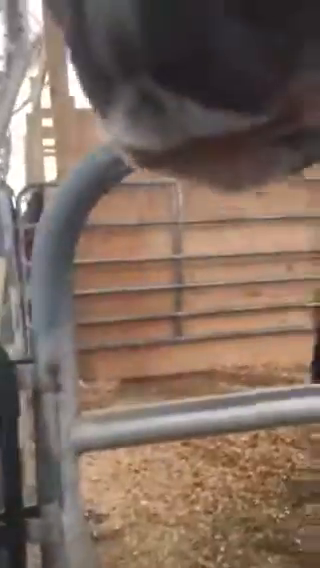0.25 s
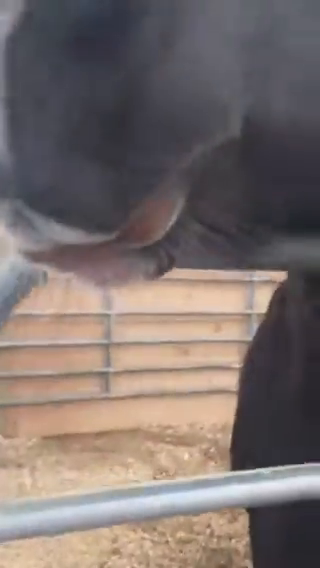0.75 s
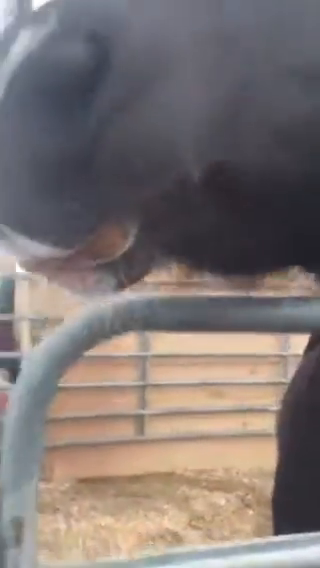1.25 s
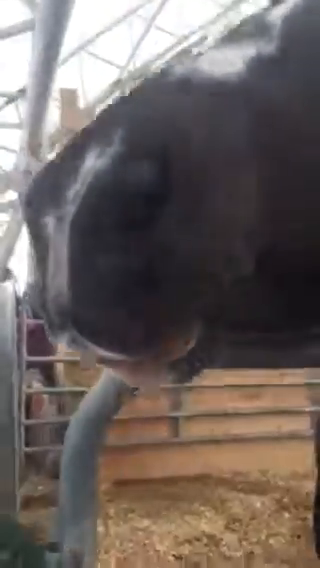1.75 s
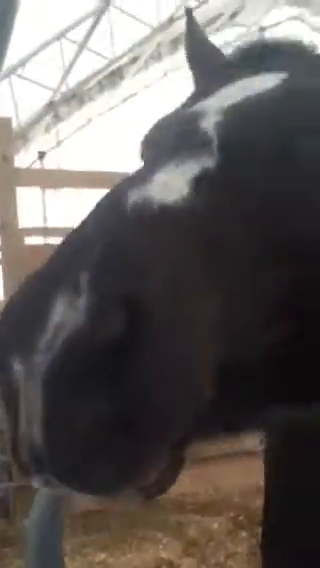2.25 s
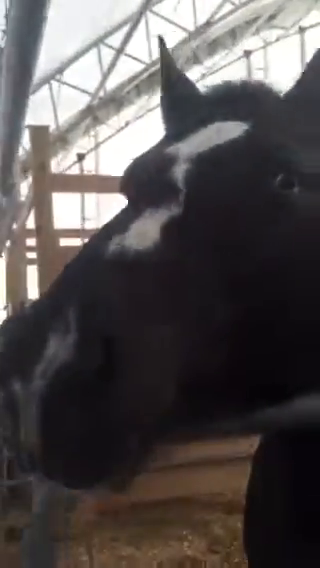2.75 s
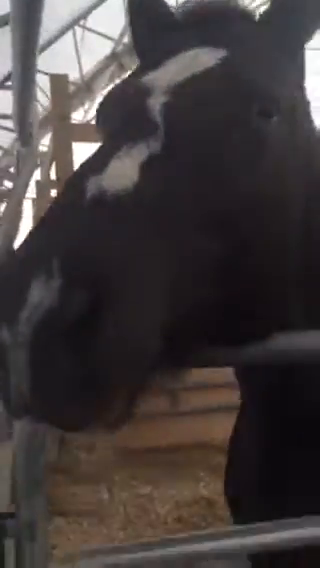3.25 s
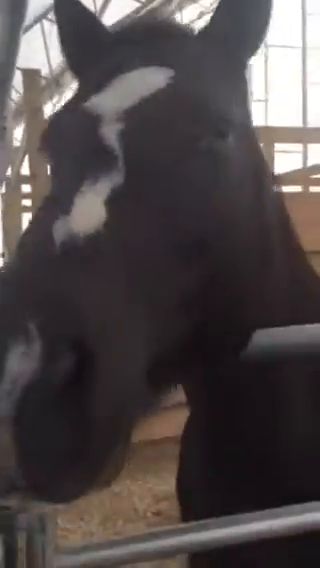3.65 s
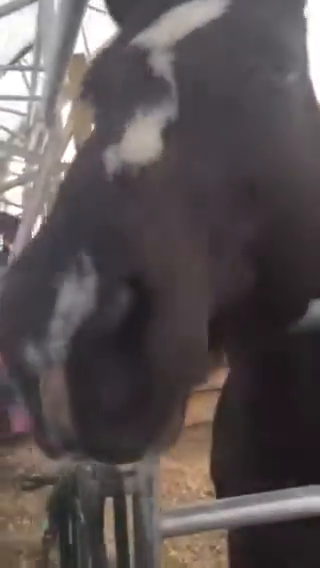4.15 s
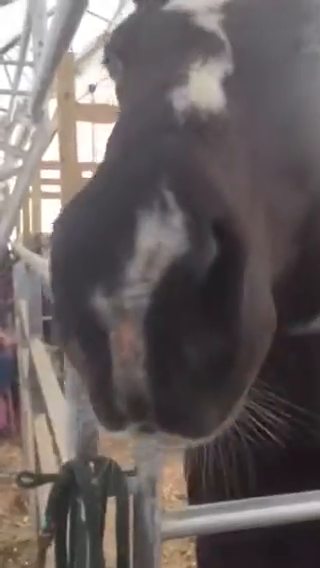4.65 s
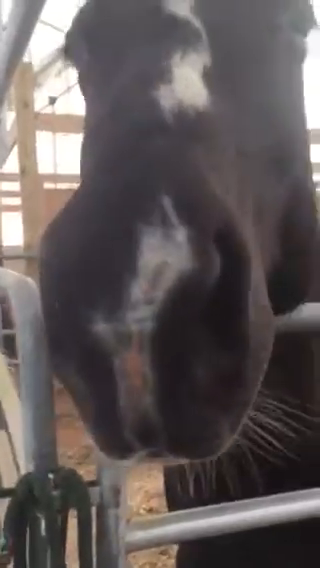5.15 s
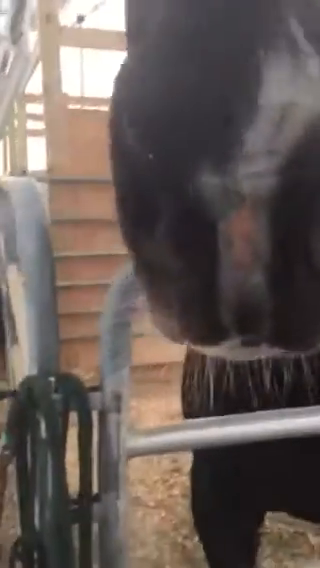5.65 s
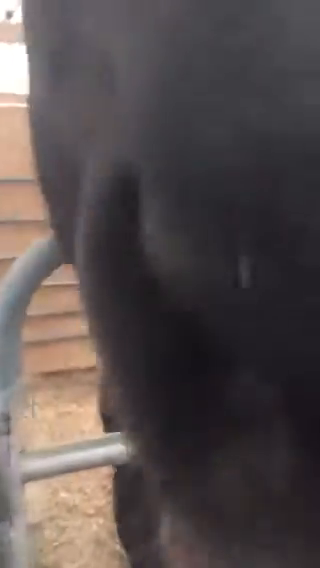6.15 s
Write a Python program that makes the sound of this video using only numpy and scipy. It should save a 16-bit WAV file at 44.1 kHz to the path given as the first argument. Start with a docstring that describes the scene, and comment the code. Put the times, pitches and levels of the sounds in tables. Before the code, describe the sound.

Close, crisp, bony crunching from a horse's mouth, sparse in the middle and thickest near the end, finishing with small wet lip smacks.

```python
"""An open barn: a horse grinds hard candy between its molars, its muzzle close to a small microphone.
Each crack is a ragged noise burst that rings the skull and mouth and knocks the jaw. Between the cracks,
trains of tiny fractures make the crumbs and fizz over a low noise drone of bone. Falling sines thud in
the jaw, low noise puffs on the microphone, and at the end noise bursts ring short hollow modes as the
lips smack. Soft barn air and steady microphone hiss lie underneath."""
import sys
import numpy as np
from scipy import signal
from scipy.io import wavfile
from scipy.ndimage import uniform_filter1d

SR = 44100
rng = np.random.default_rng(int(sys.argv[2]) if len(sys.argv) > 2 else 0)


def waveform_to_disk(signal):
    """Save audio, clipped to [-1, 1], as 16-bit WAV at the path in sys.argv[1]."""
    frames = np.transpose(np.atleast_2d(signal))
    scaled = np.clip(frames, -1, 1) * 32767
    samples = np.round(scaled).astype(np.int16)
    wavfile.write(sys.argv[1], SR, samples)


N = 281799  # samples

# colour of the head for sound made between the teeth: pitch_hz, relative level_db
HEAD_COLOUR = [(500, -44), (800, -31), (1050, -7.5), (1300, -11.5), (1750, -5), (2300, -21), (2700, -2),
               (3200, 7), (3900, -4.5), (4400, -18), (4850, -33.5), (5400, -28.5), (7800, -37.5),
               (10300, -53.5), (13000, -50.5), (16000, -54.5)]
GLINT_HZ = 9100  # the top zone starts here
# zones of the head (snap, mouth ring, splinter, top): from_hz, to_hz, burst_ms (time to its peak)
HEAD_ZONES = [(2110, 4740, 0.6), (690, 2378, 0.9), (4570, GLINT_HZ, 0.64), (GLINT_HZ, SR, 0.4)]
# fractures of the candy: start_s, snap_peak_db, mouth_ring_peak_db, splinter_treble_peak_db
CRACKS = [(0.0795, -27.5, -40, -36), (0.143, -30, -36, -39.5), (0.1688, -22.5, -38, -40),
          (0.2393, -25, -40, -36), (0.2966, -43, -32, -48.5), (0.3062, -31.5, -27, -42.5),
          (0.7004, -19.5, -23, -33.5), (1.084, -22.5, -25, -31.5), (1.108, -24.5, -50, -31),
          (1.1121, -27.5, -28, -33), (1.1455, -25, -41, -62), (1.173, -27, -56, -34.5),
          (1.197, -26, -29.5, -66), (1.222, -15, -25.5, -34), (1.381, -47, -55, -45.5),
          (1.3386, -30, -27.5, -49), (1.3992, -29, -43, -40), (1.424, -29, -37, -43),
          (1.4607, -30.5, -29, -38.5), (1.537, -27, -29, -58), (1.5908, -35, -52, -39.5),
          (1.8154, -25, -34.5, -37), (1.9635, -28, -40, -60), (1.9922, -17.5, -33, -48),
          (2.0255, -14.5, -24.5, -35.5), (2.039, -30, -22, -47), (2.06, -51.5, -60, -43),
          (2.06, -21.5, -19, -36.5), (2.3587, -30.5, -41, -50), (2.4027, -29, -43, -61),
          (2.858, -19.5, -30, -30.5), (3.2032, -26, -28, -46.5), (3.5703, -43, -39.5, -48),
          (3.898, -37, -46, -50), (4.0014, -37, -55, -61), (4.056, -45, -37.5, -59), (4.106, -32, -53, -67),
          (4.118, -41, -60, -69), (4.1603, -20, -30, -31.5), (4.163, -59, -63, -49.5),
          (4.194, -42, -43, -47), (4.4935, -21.5, -24.5, -36.5), (4.5067, -42, -36.5, -62),
          (4.605, -25.5, -57, -47), (4.625, -21, -58, -41), (4.636, -34, -60, -47.5),
          (4.672, -33.5, -46, -55), (4.691, -8, -24, -29), (4.7113, -13.5, -32, -34),
          (4.739, -26, -33.5, -48), (4.748, -20.5, -44, -37), (4.7545, -20, -45, -48),
          (4.826, -34.5, -53, -52), (4.848, -36.5, -48, -53), (4.9265, -28, -28.5, -38.5),
          (4.937, -22.5, -46, -33), (5.051, -41, -36, -50), (5.1047, -47, -27.5, -54),
          (5.153, -41, -42, -53), (5.19, -29.5, -34.5, -42), (5.2235, -27.5, -25, -38.5),
          (5.231, -30, -40, -44), (5.246, -36, -27, -48), (5.259, -21.5, -28.5, -32),
          (5.272, -32, -35, -39), (5.2825, -18, -24, -30), (5.301, -25, -57, -37), (5.3126, -31, -37, -44),
          (5.336, -20, -36, -38), (5.341, -30, -26, -34), (5.346, -18.5, -34, -33.5),
          (5.351, -31, -25, -31), (5.357, -20.5, -28, -42), (5.3621, -19, -22.5, -30),
          (5.371, -34, -29, -36), (5.383, -32, -30, -44), (5.387, -16, -28, -31.5), (5.4112, -30, -44, -47),
          (5.427, -17.5, -29.5, -35), (5.437, -45.5, -31, -43), (5.4559, -26, -25.5, -36),
          (5.464, -14.5, -40, -45), (5.4741, -28, -29.5, -41), (5.4946, -21.5, -22.5, -34.5),
          (5.5, -20.5, -33, -39), (5.5103, -30.5, -38, -34.5), (5.572, -24.5, -38, -36),
          (5.597, -25, -26, -40), (5.67, -35.5, -40, -42.5), (5.712, -40, -57, -45), (5.876, -44, -60, -51),
          (6.0864, -36, -61, -48)]
TOP_DB, TOP_PER_DB = -4, 1.1  # the more a crack's treble outweighs its snap, the more it reaches the top zone
KNOCK_DB, KNOCK_HZ = -13.5, 261  # jaw knock: level against the mouth ring, nominal pitch
LEAD_IN_DB, LEAD_IN_DB_PER_S = -25, 1819  # faint gritty noise that swells just before the burst
DEBRIS_DB, DEBRIS_DB_PER_S = -21.5, 1006  # the piece crumbles on after it, fading
GRIT_DB, SPREAD_DB = 9.5, 9  # lumpiness of lead-in and debris, and the most their levels stray
SHIFT = 0.041  # largest fractional shift of the head's resonances from crack to crack


def cracks():
    """A fracture is a ragged burst amid gritty noise that rings four zones of the head and knocks the jaw."""
    out = np.zeros(N)
    ring_t = np.arange(900) / SR
    from_break = np.arange(-600, 1100) / SR  # seconds
    after = np.maximum(from_break, 0)
    zones = []
    for lo_hz, hi_hz, burst_ms in HEAD_ZONES:
        zones.append((causal(HEAD_COLOUR, lo_hz, hi_hz)[:len(ring_t)], burst_ms))
    noises = rng.standard_normal((len(CRACKS), 2, len(from_break)))
    luck = rng.uniform(-1, 1, (len(CRACKS), 3))
    for crack, (noise, lumps), (shift, early, late) in zip(CRACKS, noises, luck):
        start_s, snap_db, ring_db, treble_db = crack
        top_db = treble_db + TOP_DB + TOP_PER_DB * (treble_db - snap_db)
        grit = evened(gain_of(GRIT_DB * evened(uniform_filter1d(lumps, size=40))))
        lead_in = gain_of(LEAD_IN_DB + LEAD_IN_DB_PER_S * from_break + SPREAD_DB * early)
        debris = gain_of(DEBRIS_DB - DEBRIS_DB_PER_S * from_break + SPREAD_DB * late)
        gritty = grit * np.where(from_break < 0, lead_in, debris)
        for (body, burst_ms), peak_db in zip(zones, (snap_db, ring_db, treble_db, top_db)):
            burst = peaked(after * np.exp(-after * 1000 / burst_ms))
            # reading the response faster or slower moves its resonances up or down
            shifted_body = np.interp(ring_t * (1 + SHIFT * shift), ring_t, body)
            sound = signal.fftconvolve(noise * (burst + gritty), shifted_body)
            add(out, start_s + from_break[0], gain_of(peak_db) * peaked(sound))
        add(out, start_s, gain_of(ring_db + KNOCK_DB) * thud(KNOCK_HZ))
    return out


# colour of the jaw bone's drone: pitch_hz, relative level_db
JAW_COLOUR = [(60, -22.5), (130, -2.5), (230, 1.5), (330, -2.5), (480, -17.5), (700, -23), (1000, -54.5)]
# grinding strokes of the molars: start_s, end_s, crumbs_db, jaw_drone_db, fizz_db
STROKES = [(-.05, .065, -45.5, -44, -67), (.07, .16, -51, -45.5, -68), (.235, .325, -47, -45, -69),
           (.345, .43, -46.5, -46, -76), (.55, .67, -48.5, -49, -71), (.69, .77, -57.5, -51.5, -75),
           (.8, .9, -56, -51.5, -88), (1.09, 1.52, -47, -43, -61.5), (1.66, 1.76, -51, -45, -68),
           (1.78, 1.85, -49, -45.5, -73), (1.91, 2.15, -54, -47.5, -76), (2.35, 2.42, -51.5, -44, -68),
           (2.495, 2.59, -50.5, -42, -67), (2.62, 2.74, -59, -57, -85), (3.185, 3.23, -59, -50.5, -81),
           (3.56, 3.61, -53.5, -83, -68), (3.645, 3.71, -56.5, -50.5, -76),
           (3.935, 4.07, -52.5, -48, -77.5), (4.39, 4.43, -52.5, -47.5, -76),
           (4.53, 4.7, -55.5, -53, -71.5), (4.73, 4.765, -50, -54.5, -62), (4.92, 5.01, -61, -58, -75),
           (5.2, 5.52, -58, -51.5, -66), (5.335, 5.385, -41, -36, -67), (5.655, 5.74, -60, -61, -67),
           (6.06, 6.29, -67.5, -65.5, -88), (6.34, 6.45, -61, -78, -84)]
RING_DB = 1.16  # mouth ring against the bright crumbs
LINGER_DB, LINGER_DB_PER_S = -12.5, 56  # after a stroke a little of it goes on and fades
ARCH_DB = -1.5  # pressure at both ends of a stroke against its middle


def grinding():
    """Each stroke crushes crumbs, with a dull fizz on top and sparse sharp ticks; the bone drones along."""
    (snap_lo, snap_hi, _), (_, ring_hi, _), (top_lo, _, _), _ = HEAD_ZONES
    sparse = crumbs(per_s=93, spread_db=3.7)
    ticks = gain_of(-4.0) * through(sparse, HEAD_COLOUR, snap_lo, snap_hi)
    ticks = ticks + gain_of(-21.0) * through(sparse, HEAD_COLOUR, top_lo)
    fizz = through(crumbs(per_s=6400, spread_db=1.0), HEAD_COLOUR, top_lo)
    fizz = chewed(fizz, patchy_db=8.5)
    bright = through(crumbs(per_s=3000, spread_db=2.27), HEAD_COLOUR, snap_lo, hi_hz=4250)
    bright = chewed(bright, patchy_db=0.5, column=2, pivot_hz=3200)
    ring = through(crumbs(per_s=3000, spread_db=0.32), HEAD_COLOUR, lo_hz=970, hi_hz=ring_hi)
    ring = chewed(ring, patchy_db=3.0, column=1, pivot_hz=1740)
    drone = through(rng.standard_normal(N) * gain_of(3.2 * wander(29)), JAW_COLOUR)
    crumb_gain, drone_gain, fizz_gain = (
        played(STROKES, column, 0.025, 0.026, LINGER_DB, LINGER_DB_PER_S, ARCH_DB) for column in (2, 3, 4))
    grit = bright + ticks + gain_of(RING_DB) * ring
    return crumb_gain * grit + drone_gain * drone + fizz_gain * fizz


# jaw thuds: start_s, peak_db, nominal pitch_hz (the glide starts above it and ends below)
THUDS = [(1.197, -20, 225), (1.338, -33, 230), (1.465, -32.5, 265), (2.509, -33.5, 193),
         (3.203, -38.5, 250), (4.493, -34.5, 251), (5.205, -30.5, 310), (5.225, -27.5, 327),
         (5.244, -24, 315), (5.261, -21.5, 276), (5.282, -24.5, 296), (5.352, -30.5, 316),
         (5.495, -29.5, 368)]


def thuds():
    """The jaw snaps shut on a piece: a short sine in the bone, falling in pitch."""
    out = np.zeros(N)
    for start_s, peak_db, pitch_hz in THUDS:
        add(out, start_s, gain_of(peak_db) * thud(pitch_hz))
    return out


# modes of the hollow between the lips: ratio to the smack's base_hz, level_db, decay_s (by 60 dB)
LIP_MODES = [(0.988, 2, 0.018), (0.58, -11.5, 0.021), (1.5, -11, 0.018)]
# hollow lip smacks: start_s, peak_db, base_hz, burst_ms (time to the burst's peak)
SMACKS = [(6.077, -36.5, 1100, 0.47), (6.085, -37.5, 1370, 0.43), (6.096, -36, 1050, 1.4),
          (6.119, -48, 1290, 1.5), (6.151, -27, 1460, 3.3), (6.198, -39, 2040, 1.6),
          (6.21, -41, 2040, 10.5), (6.223, -37, 1400, 7.9), (6.343, -45.5, 770, 5.8)]


def smacks():
    """Each smack is a ragged, spluttering burst that rings a hollow: one short mode and weaker neighbours."""
    out = np.zeros(N)
    t = np.arange(2500) / SR
    noises = rng.standard_normal((len(SMACKS), 2, len(t)))
    for (start_s, peak_db, base_hz, burst_ms), (noise, lumps) in zip(SMACKS, noises):
        hollow = np.zeros(len(t))
        for ratio, mode_db, decay_s in LIP_MODES:
            hollow += gain_of(mode_db - 60 * t / decay_s) * np.sin(2 * np.pi * base_hz * ratio * t)
        hollow *= np.minimum(t * base_hz, 1)  # swells in over one cycle
        burst = peaked(t * np.exp(-t * 1000 / burst_ms))
        wet_smear = gain_of(-14 - 510 * t) * np.minimum(t / 0.003, 1)
        splutter = gain_of(2.7 * evened(uniform_filter1d(lumps, size=100)))
        lips = noise * (burst + wet_smear) * splutter
        add(out, start_s, gain_of(peak_db) * peaked(signal.fftconvolve(lips, hollow)))
    return out


# colour of breath on the microphone: pitch_hz, relative level_db
BREATH_COLOUR = [(20, -68), (40, -5), (75, 5.5), (120, 3), (200, -2.5), (320, -22), (500, -108)]
# air from the nostrils, long breaths and short puffs: start_s, end_s, level_db
PUFFS = [(-.05, .92, -59.5), (.285, .43, -34), (.455, .48, -28), (.5, .545, -30.5), (.58, .66, -42.5),
         (1.06, 1.56, -56), (2.3, 3.0, -59.5), (2.45, 2.72, -45.5), (5.18, 5.56, -51)]


def puffs():
    """Air from the nostrils makes lumpy low turbulence on the microphone."""
    lumps = rng.standard_normal(N) * gain_of(1.5 * wander(24))
    gain = played(PUFFS, column=2, rise=0.021, fall=0.011, linger_db=-18, fade_db=63)
    return gain * through(lumps, BREATH_COLOUR)


# colour of the barn's air and the microphone's hiss: pitch_hz, relative level_db
BARN_COLOUR = [(24, -34), (40, 2.5), (80, 8), (301, -7), (758, -6.5), (1410, -6.5), (2450, -16.5),
               (3140, -8), (4800, -29.5), (12700, -37), (15500, -38.5)]
BARN_DB = -61.5  # level that the air wavers about
HISS_DB, HISS_HZ = -78.5, 4840  # hiss level, and the pitch where air gives way to hiss


def barn():
    """Soft noise of the barn air that wavers in level, under the steady hiss of the microphone."""
    air = through(rng.standard_normal(N), BARN_COLOUR, hi_hz=HISS_HZ)
    hiss = through(rng.standard_normal(N), BARN_COLOUR, lo_hz=HISS_HZ)
    return gain_of(BARN_DB + 1.1 * wander(10.8)) * air + gain_of(HISS_DB) * hiss


def thud(hz):
    """A few cycles in the jaw bone that fall in pitch from 2.41 towards 0.76 times hz, peak 1."""
    t = np.arange(1500) / SR
    turns = np.cumsum(hz * (0.76 + 1.65 * np.exp(-t / 0.0023))) / SR
    return peaked(np.sin(2 * np.pi * turns) * t * np.exp(-(t * hz / 1.65) ** 2))


def crumbs(per_s, spread_db):
    """A train of tiny fractures of uneven size at random moments, its level lumpy."""
    size = gain_of(spread_db * np.minimum(rng.exponential(1, N), 5)) * rng.standard_normal(N)
    breaks = rng.random(N) < per_s / SR
    return size * breaks * gain_of(0.92 * wander(35.0))


# tone of the grinding as the head turns: time_s, mouth_ring_db_per_octave, bright_crumbs_db_per_octave
HEAD_TILT = [(0, 8, -1.5), (.9, 2, -20), (1.3, 2.5, 2), (3.0, -6.5, 4), (4.5, 3.5, 3.5), (6.4, -3, 0)]


def chewed(x, patchy_db, column=0, pivot_hz=1):
    """The mouth keeps changing shape, so spectral patches swell and fade; a HEAD_TILT column leans the tone."""
    hz, t, z = signal.stft(x, SR, nperseg=256)
    patches = rng.standard_normal(z.shape[::-1]).T
    patches = uniform_filter1d(patches, size=3, axis=0)  # smooth over pitch
    patches = evened(uniform_filter1d(patches, size=7, axis=1))  # smooth over time
    table = np.transpose(HEAD_TILT)
    octaves = np.clip(np.log2((hz + 1) / pivot_hz), -1, 1)  # the lean stops an octave from the pivot
    lean_db = np.outer(octaves, np.interp(t, table[0], table[column])) * (column > 0)  # column 0: no lean
    return evened(signal.istft(z * gain_of(patchy_db * patches + lean_db), nperseg=256)[1][:N])


def played(table, column, rise, fall, linger_db=-90, fade_db=45, arch_db=0):
    """Gain at every sample: each row swells in, holds, drops, and leaves a faint trail that fades."""
    t = np.arange(0, N + 44, 44) / SR  # one step per 44 samples
    power = np.zeros(len(t))
    for row in table:
        start_s, end_s = row[:2]
        ramp = np.clip(np.minimum((t - start_s) / rise, (end_s - t) / fall) + .5, 0, 1)
        trail = gain_of(linger_db - fade_db * (t - end_s)) ** 2 * (t > end_s)
        off_centre = np.clip((2 * t - start_s - end_s) / (end_s - start_s), -1, 1)
        level = gain_of(row[column] + arch_db * off_centre ** 2)
        power += level ** 2 * (np.sin(np.pi / 2 * ramp) ** 2 + trail)
    return np.interp(np.arange(N) / SR, t, np.sqrt(power))


def wander(hz):
    """Random drift of rms 1: noise lowpassed at hz."""
    lowpass = signal.butter(2, hz, fs=SR, output="sos")
    return evened(signal.sosfilt(lowpass, rng.standard_normal(N)))


def through(x, points, lo_hz=0, hi_hz=SR):
    """A sound coloured by one zone of a spectrum, rms 1."""
    return evened(signal.oaconvolve(x, causal(points, lo_hz, hi_hz))[:N])


def causal(points, lo_hz=0, hi_hz=SR, size=4096):
    """Minimum-phase response of a spectrum, turned far down outside one zone."""
    hz = abs(np.fft.fftfreq(size, 1 / SR)) + 1
    f, db = np.transpose(points)
    octaves_outside = np.maximum(np.log2((lo_hz + 1) / hz), 0) + np.maximum(np.log2(hz / hi_hz), 0)
    zone_db = np.interp(np.log(hz), np.log(f), db) - 90 * octaves_outside
    log_gain = np.log(gain_of(np.maximum(zone_db, -100)))
    # the Hilbert transform of the log gain gives the minimum phase
    return np.fft.ifft(np.exp(np.conj(signal.hilbert(log_gain)))).real[:size // 2]


def gain_of(db):
    """Decibels to gain."""
    return 10 ** (np.asarray(db) / 20)


def evened(x):
    """Scales to rms 1."""
    return x / np.sqrt(np.mean(x ** 2) + 1e-20)


def peaked(x):
    """Scales to peak 1."""
    return x / (abs(x).max() + 1e-20)


def add(mix, s, sound):
    """Mixes a sound in at a time in seconds."""
    part = mix[round(s * SR):][:len(sound)]
    part += sound[:len(part)]


def scene():
    """All sources on one channel."""
    return (cracks() + grinding() + thuds() + smacks() + puffs() + barn())[None]


def record(dry):
    """The band limit of the recorder: a lowpass at 15500 Hz."""
    lowpass = signal.firwin(511, 15500, window=("kaiser", 9), fs=SR)
    return signal.oaconvolve(dry, lowpass[None], "same")


dry = scene()
out = record(dry)
waveform_to_disk(out)
```